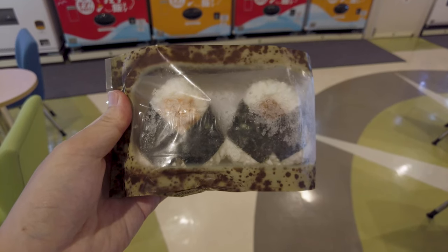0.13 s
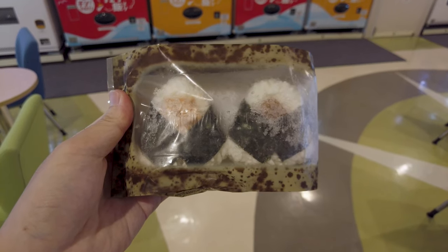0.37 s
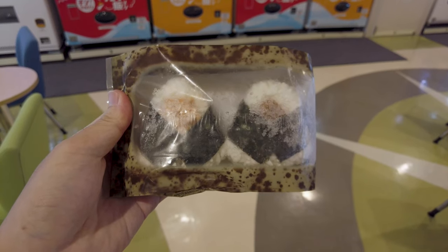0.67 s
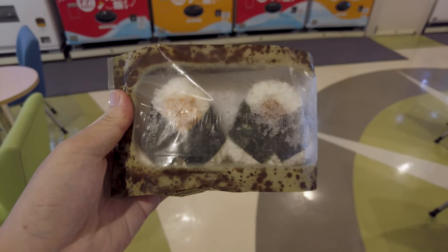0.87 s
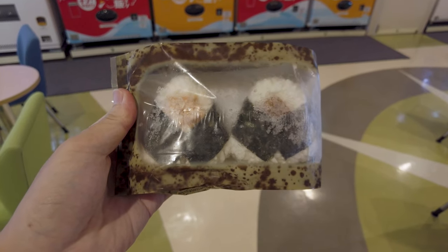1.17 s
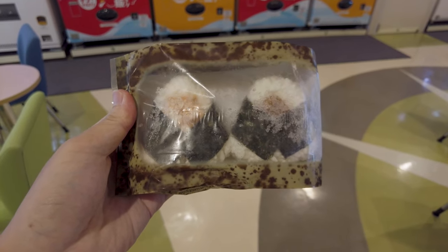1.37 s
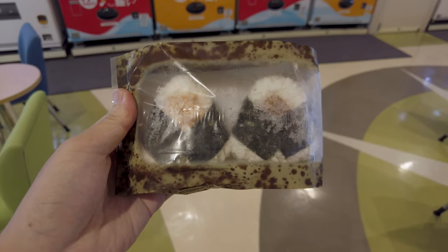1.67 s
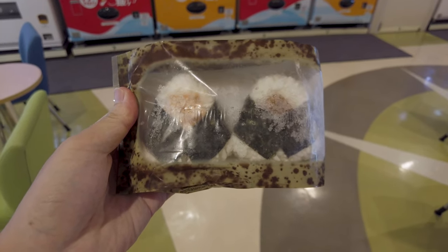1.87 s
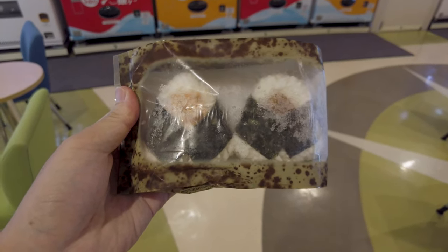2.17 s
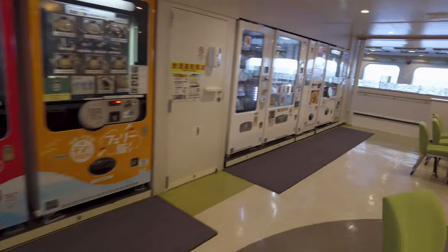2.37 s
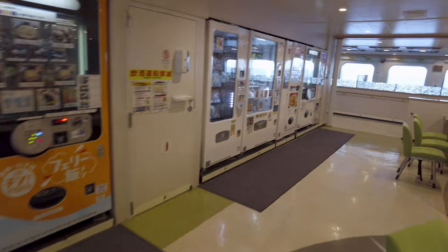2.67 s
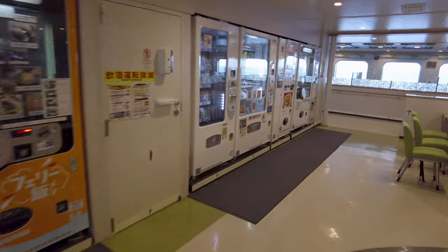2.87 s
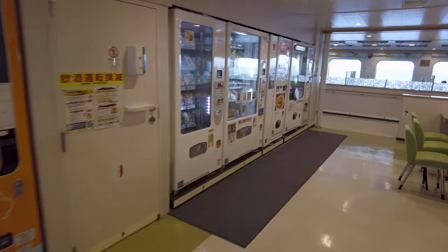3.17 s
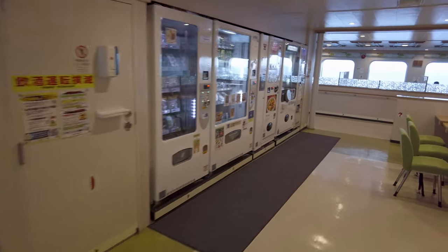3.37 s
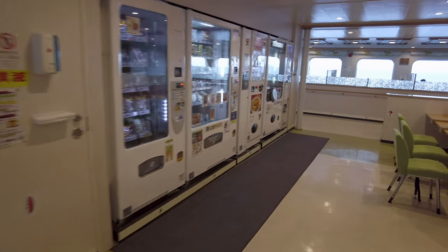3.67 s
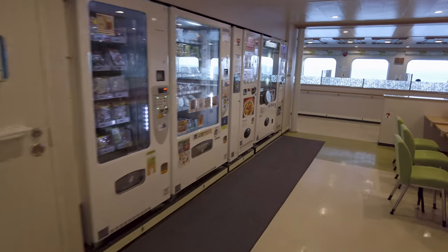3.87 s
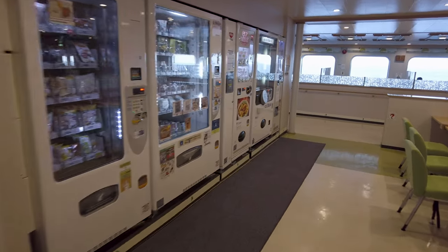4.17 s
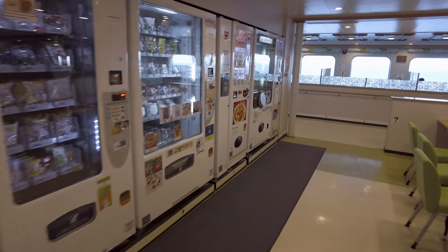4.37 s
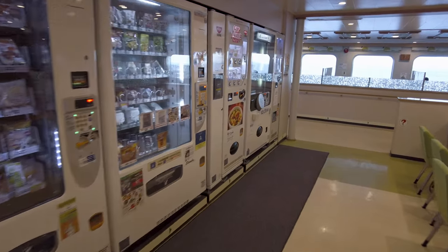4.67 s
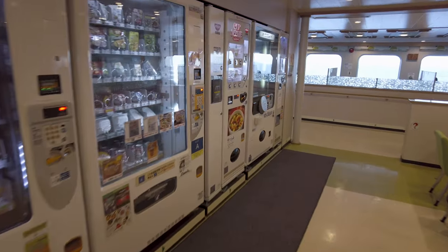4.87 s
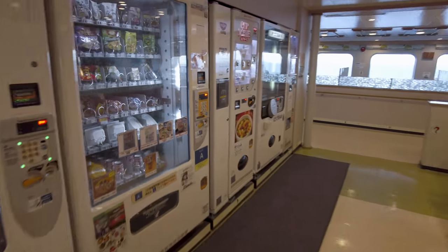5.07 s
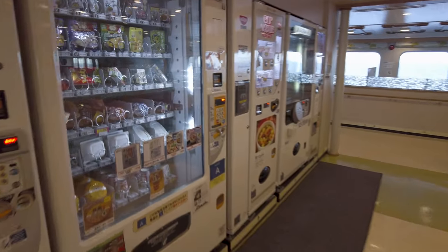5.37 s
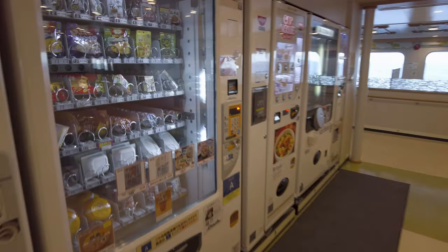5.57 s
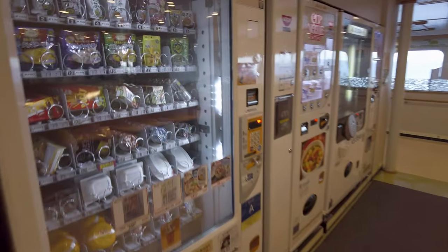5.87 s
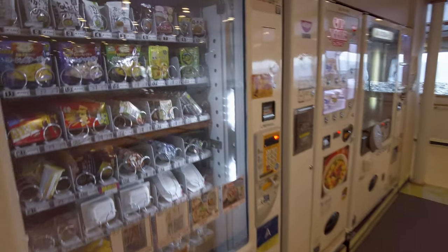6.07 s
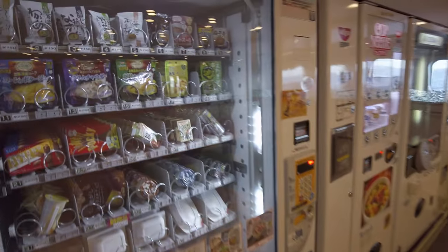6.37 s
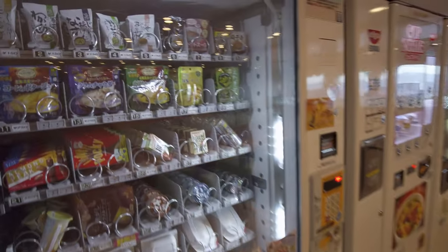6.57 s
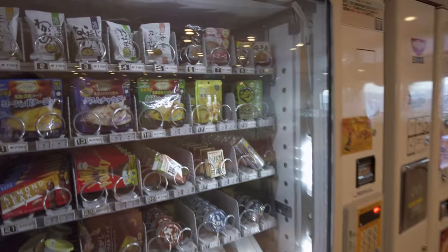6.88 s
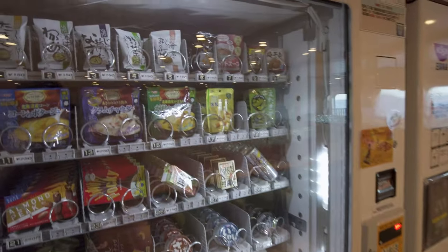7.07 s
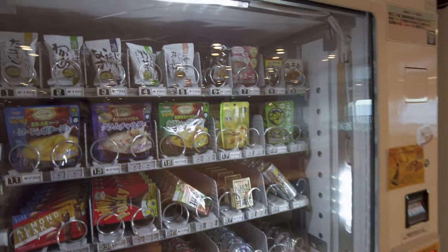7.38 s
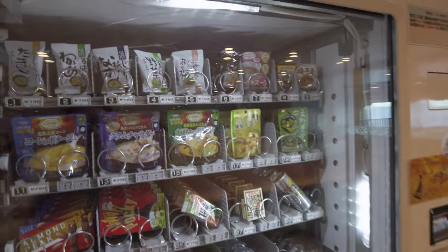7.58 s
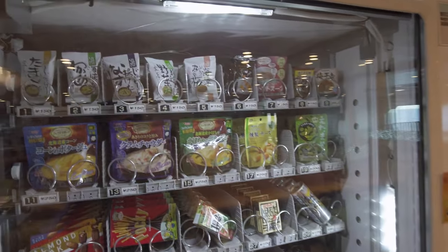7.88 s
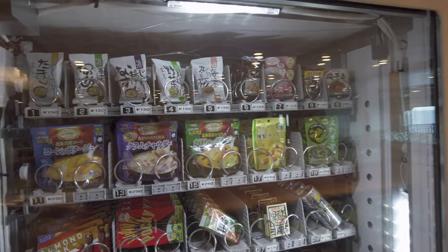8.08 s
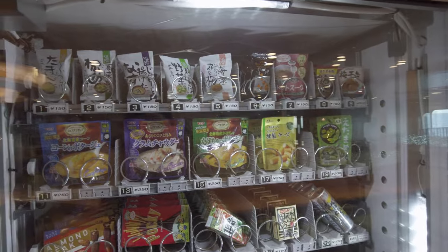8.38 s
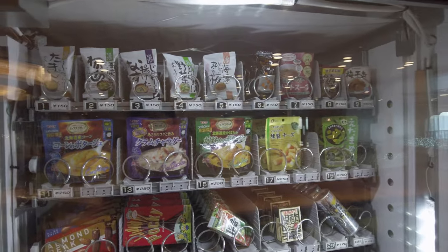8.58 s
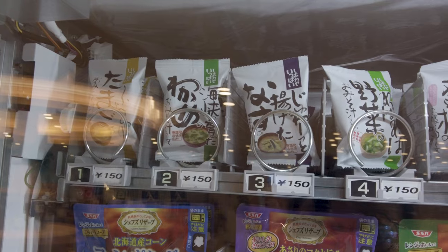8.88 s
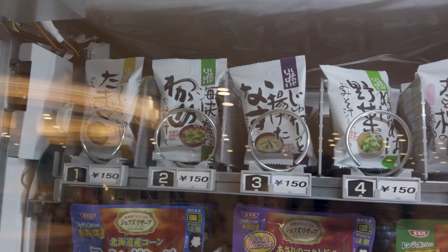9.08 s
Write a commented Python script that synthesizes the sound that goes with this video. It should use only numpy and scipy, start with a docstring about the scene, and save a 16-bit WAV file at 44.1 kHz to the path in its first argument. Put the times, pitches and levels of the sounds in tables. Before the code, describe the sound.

Inside a ferry, a low pulsing engine drone and steady air hiss carry on beneath soft swishes, light scuffs and one late click.

```python
"""A deep throb fills a ferry's lounge: the hull shakes with every turn of the propeller shaft.
Ventilation rushes, the cabin hums and vending machines whine faintly, heard first at a table, then in
the aisle, then at a machine. Soft swishes, scuffs, squeaks and ticks lie on top, and a sharp pop comes
near the end. Surges of the throb drive a limiter, so the hiss drops abruptly and creeps back."""
import sys
import numpy as np
from scipy import signal
from scipy.fft import rfft, irfft
from scipy.io import wavfile
from scipy.ndimage import uniform_filter1d, minimum_filter1d

SR = 44100
rng = np.random.default_rng(int(sys.argv[2]) if len(sys.argv) > 2 else 0)


def generate_wav(sig):
    """Save sig (samples, or channels by samples) to the path in sys.argv[1] as 16-bit PCM at SR."""
    pcm = np.round(np.clip(np.atleast_2d(sig).T, -1, 1) * 32767).astype(np.int16)
    wavfile.write(sys.argv[1], SR, pcm)


N = 407484
T = np.arange(N) / SR
HZ = np.maximum(np.arange(N // 2 + 1) * SR / N, 1e-3)
POP_S = 8.7677


def hull(where, shaft_hz=1.99, waver=0.28, evenness=0.72, thinning_db=-9):
    """The shaft shakes the hull at multiples of its turning rate. After the pop the throb is duller."""
    # Strong tones, mostly propeller blade beats. Each row: multiple of the turning rate,
    # then relative level in dB at the table, aisle and machine.
    blade_beats = [(6, -17, -19, -16), (9, -16.5, -21, -11.6), (12, -14.5, -16, -21.5), (15, -23, -17, -22),
                   (16, -26, -22.5, -21.5), (20, -26, -25, -31), (24, -28, -38, -39), (30, -32, -36, -36)]
    # All the other multiples. Each row: pitch in Hz, relative level in dB.
    weak_tones = [(8, -35), (14, -25), (22, -23.5), (34, -26.5), (42, -33.5), (52, -38.5), (66, -48),
                  (86, -49), (100, -61)]
    strong = {round(multiple): levels for multiple, *levels in blade_beats}
    thinning = from_db(thinning_db * (T > POP_S))
    out = np.zeros(N)
    for multiple in range(4, 50):
        hz = multiple * shaft_hz
        gain = from_db(strong[multiple]) @ where if multiple in strong else from_db(at_hz(weak_tones, hz))
        if multiple > 9:
            gain = gain * thinning
        out += gain * (1 + waver * drift(count=24)) * np.sin(2 * np.pi * (hz * T + rng.random()))
    size = SR // 28
    crest = smooth(-minimum_filter1d(-np.abs(out), 2 * size), size)
    return out / crest.mean() / (crest / crest.mean()) ** evenness   # makes the crests nearly even


def surging(throb, level_db=-3.0, lull_db=-11, rise_s=0.02, fall_db_per_s=59,
            swing_hz=24.7, swing_s=0.018, swing_db=-1.02):
    """The throb slackens in lulls and shudders in surges, each opened by one full swing of the hull."""
    # Lulls. Each row: middle in seconds, half-length in seconds.
    lulls = [(0.916, 0.032), (2.031, 0.012), (2.413, 0.017), (5.75, 0.01), (2.71, 0.018), (4.69, 0.037),
             (6.181, 0.017), (7.18, 0.022), (8.19, 0.032), (8.685, 0.017), (9.235, 0.01)]
    # Surges. Each row: start in seconds, extra level in dB, hold in seconds.
    surges = [(0.016, 4.5, 0.034), (0.337, 3, 0.062), (0.507, 3, .02), (0.834, 4.5, 0.026),
              (0.991, 4.5, 0.013), (1.33, 3, 0.016), (1.469, 3.5, 0.045), (1.83, 4, 0.026),
              (2.003, 3.5, 0.046), (2.45, 3, 0.049), (2.884, 2.5, 0.033), (3.138, 2, 0.1),
              (3.546, 1, 0.067), (3.801, 1.5, 0.029), (4.028, 3, .02), (4.108, 2, 0.047),
              (4.273, 3.5, 0.018), (4.531, 0.5, 0.041), (4.62, 4, 0.06), (4.767, 3, 0.067), (4.951, 1, .01),
              (5.08, 2, .02), (5.122, 4.5, 0.028), (5.274, 2.5, 0.038), (5.437, 4, 0.014),
              (5.725, 3, 0.073), (5.939, 3, 0.013), (6.026, 2.5, 0.047), (6.132, 4, 0.041),
              (6.318, 3, 0.11), (6.509, 2, 0.087), (6.739, 1, 0.059), (6.953, 2, 0.13), (7.094, 3.5, 0.042),
              (7.418, 1, 0.033), (7.508, 1, 0.0092), (7.629, 2, 0.014), (7.768, 2, .05), (7.843, 4, 0.11),
              (7.934, 4, 0.063), (8.079, 5, 0.092), (8.268, 7, 0.07), (8.436, 4, 0.11), (8.577, 3, 0.06),
              (8.725, 2, 0.15), (9.153, 3.5, 0.11)]
    out = throb * from_db(lull_db * sum(bump(s, length) for s, length in lulls))
    extra_db = np.zeros(N)
    for s, db, hold in surges:
        i = np.flatnonzero(np.abs(T - s) < .1)
        near = bump(s, swing_s)[i]
        swing = np.cos(2 * np.pi * swing_hz * (T[i] - s))
        direction = np.sign(np.sum(near * swing * out[i]))   # the way the hull already moves
        out[i] += near * (from_db(swing_db) * direction * swing - out[i])
        rise = np.clip((T - s) / rise_s + 1, 0, 1)
        held_db = np.clip(db - fall_db_per_s * (T - s - hold), 0, db)
        extra_db = np.maximum(extra_db, rise * held_db)
    return out * from_db(level_db + extra_db)


def pop(throb, left=0.49, right=0.71, span_s=0.0085):
    """A sharp click where the throb breaks off and jumps to a new value."""
    age = T - POP_S
    near = np.exp(-np.abs(age) / span_s) * (1 + np.abs(age) / span_s)
    return throb * (1 - near) + near * np.sign(age) * np.array([[left], [right]])


def ventilation(where, air_db=0.38, drone_db=-1.6, air_depth=0.74):
    """A low cabin drone and rushing air swell and sink slowly together."""
    # Tone colours of drone and air: "common" reaches both ears alike, "diffuse" differs between them.
    # Each row: frequency in Hz, relative level in dB.
    drone_common = [(20, -47.5), (45, -40), (65, -44.5), (85, -54), (102, -53), (150, -57.5), (200, -61.5),
                    (280, -64.5), (400, -68), (600, -81.5), (1200, -105)]
    drone_diffuse = [(20, -60.5), (60, -73), (120, -75), (250, -73.5), (450, -76.5), (1200, -105)]
    air_common = [(200, -83.5), (550, -72.5), (800, -77), (1060, -78.5), (1200, -79.5), (1240, -75),
                  (1700, -79), (2450, -86), (3200, -88), (3600, -91.5), (4600, -93), (8000, -106),
                  (11000, -111), (15500, -114)]
    air_diffuse = [(200, -95), (550, -75.5), (1160, -75), (1240, -83.5), (2400, -88), (3200, -88),
                   (3600, -93.5), (4400, -91.5), (6300, -100), (9000, -111), (15500, -120)]
    # The slow swell. Each row: time in seconds, relative level in dB.
    slow_level = [(0.0, -42), (.7, -42.5), (1.5, -43), (2.3, -42.5), (2.6, -44.5), (3.75, -43.5),
                  (4.1, -45), (4.5, -46.5), (5.0, -45.5), (5.55, -44.5), (6.3, -44.5), (6.85, -44),
                  (7.6, -46), (8.3, -45), (8.95, -45.5), (9.24, -46)]
    level = np.interp(T, *np.transpose(slow_level))
    swell_db = level - level.mean()
    drone = room_noise(drone_common, drone_diffuse, where) * from_db(drone_db + swell_db)
    air = room_noise(air_common, air_diffuse, where) * from_db(air_db + air_depth * swell_db)
    return drone + by_the_glass(air)


def room_noise(common, diffuse, where, ripple_db=1.7, count=700):
    """Broad noise, coloured at each spot by resonances and by a fine ripple from reflections."""
    # Resonances and hollows of cabin, ducts and compressors. Each row: frequency in Hz, width in Hz,
    # then boost in dB at the table, aisle and machine.
    resonances = [(112.5, 13, 0.5, 3, 5), (151, 7.1, 0.5, 4, 5.5), (174.1, 7, 5, 12.5, 6.5),
                  (235.8, 32, 4, 4.5, 5.5), (290, 27, 5, -0.5, 3.5), (360, 19, 4.5, 3.5, 0),
                  (450, 12, 3, 3.5, 1), (580, 56, -1.5, 2.5, 1), (680, 60, 1.5, -0.5, 1),
                  (772, 41, 1, 0.5, 3.5), (900, 45, 5.5, 0.5, 2.5), (1060, 230, -2.5, -2.5, -1),
                  (1480, 460, -1.3, 0, 0.5), (2070, 110, -0.5, 1, 1.5), (2640, 110, 0.5, 0.5, 1.5),
                  (2980, 280, 3, 3, 3), (11400, 4300, -2.5, -2.5, -2), (13800, 2600, -5, -3, -4.5)]
    shapes = np.array([bell(hz, width) for hz, width, *_ in resonances])
    boost_db = np.array(resonances)[:, 2:].T @ shapes
    grid_hz = np.linspace(0, HZ[-1], count)
    ripple = np.array([np.interp(HZ, grid_hz, row) for row in rng.standard_normal((3, count))])
    room = from_db(boost_db + ripple_db * ripple * (HZ > 400)) * (HZ > 10)
    parts = [where * noise(room * from_db(at_hz(colour, HZ))) for colour in (common, diffuse)]
    return stereo(*np.sum(parts, axis=1))


def by_the_glass(air, hz=930, width_hz=480):
    """Close to the machine's glass front, its reflection hollows out the middle of the rushing air."""
    # The hollow. Each row: time in seconds, depth from 0 to 1.
    hollow = [(5.0, 0.1), (6.3, 0.2), (7.6, 0.36), (8.7, 0.38), (8.8, .25)]
    depth = np.interp(T, *np.transpose(hollow))
    return air - depth * irfft(rfft(air) * bell(hz, width_hz), N)


def hums(waver_turns=.17, flutter_db=2.0, spread=.25):
    """A cabin resonance builds up to a wavering, fluttering tone and dies away."""
    # Hums. Each row: middle in seconds, level in dB, pitch in Hz, half-length in seconds.
    tones = [(0.335, -30, 82, .09), (0.448, -41, 243, .12), (0.872, -40, 222, .06),
             (1.655, -38.5, 238, 0.071), (2.27, -29, 78, 0.055), (2.664, -29, 76, 0.048),
             (2.917, -32, 74, 0.039), (5.42, -41.5, 240, 0.095), (6.05, -41.5, 241.7, .17),
             (6.681, -41, 243, .1), (6.852, -27, 90, .07), (8.444, -36, 226, 0.08)]
    out = 0
    for s, db, hz, length in tones:
        phase = 2 * np.pi * (hz * T + rng.random() + waver_turns * drift(count=260))
        swell = from_db(db + flutter_db * drift(count=260)) * bump(s, length)
        out += swell * np.sqrt(2) * stereo(np.sin(phase), spread * np.cos(phase))
    return out


def scuffs(spread=.6, rustle_db=-4.0):
    """Short rubs, as of soles and clothing: a dull body with a rustle on top."""
    # Scuffs. Each row: middle in seconds, body level in dB, relative rustle level in dB,
    # half-length in seconds.
    rubs = [(.16, -49, -48, 0.065), (0.662, -55, -47.5, 0.072), (1.163, -40.5, -45.5, 0.048),
            (1.29, -55, -52, .018), (1.672, -41.5, -46, 0.051), (2.162, -40.5, -54, 0.046),
            (2.29, -48, -55, .06), (2.79, -54, -52, .07), (3.75, -44, -50, 0.052), (3.886, -53, -57, .04),
            (4.32, -44, -46, 0.042), (4.465, -49, -51, 0.072), (5.526, -42.5, -48, 0.028),
            (5.655, -53, -55, 0.02), (6.235, -53, -48.5, 0.05), (6.7, -43.5, -52, 0.037),
            (6.876, -43.5, -43, 0.031), (7.228, -47, -55, 0.033), (7.327, -56, -53, 0.044),
            (7.706, -45.5, -52, 0.03), (8.225, -58, -53, 0.03), (8.69, -47, -54, 0.016),
            (8.948, -43, -51, 0.036), (9.11, -53, -56, .025)]
    # Tone colour of the body. Each row: frequency in Hz, relative level in dB.
    colour = [(100, -12.5), (300, 7), (800, 4), (1600, -1.5), (3000, -9), (6000, -21.5), (15500, -38)]
    shapes = np.array([bump(s, length) for s, *_, length in rubs])
    body, top = from_db(np.array(rubs)[:, 1:3].T) @ shapes
    dull = wide_noise(from_db(at_hz(colour, HZ)) * (HZ > 10), spread)
    return body * dull + from_db(rustle_db) * top * rustle()


def swishes(level_db=-6.0, tail_db=-8.5, tail_rise_s=.02, tail_s=0.07, spread=.7, grain_db=1.5):
    """Short brushing hisses: a bright, grainy start, then a duller rustling tail."""
    # Swishes, the first four a shaft turn apart. Each row: start in seconds, relative level in dB,
    # rise in seconds, decay in seconds.
    strokes = [(0.630, -43, .004, 0.033), (1.125, -41, .004, 0.031), (1.6265, -43, .004, 0.036),
               (2.1266, -48.5, .004, 0.027), (4.2144, -53, .005, 0.022), (4.2971, -55.5, .004, .035),
               (4.43, -62, .006, 0.059), (4.98, -56, .008, 0.037), (6.1894, -58, .005, 0.06),
               (6.6644, -58, .007, .033), (6.8563, -49.5, .004, .028), (7.27, -46, 0.012, 0.03),
               (7.517, -48, .008, 0.036), (8.024, -47.5, 0.01, 0.051), (8.518, -45.5, .012, 0.032)]
    # Tone colour of the bright start. Each row: frequency in Hz, relative level in dB.
    colour = [(300, 3.5), (1500, 1), (3000, 12), (5500, 9.5), (8000, 5.5), (10500, 5), (12300, 2),
              (14000, 6.5), (15500, 2.7)]
    head, tail = np.zeros((2, N))
    for s, db, rise_s, decay_s in strokes:
        age = np.maximum(T - s, 0)
        head += from_db(db) * (1 - np.exp(-age / rise_s)) * 2 * np.exp(-age / decay_s)
        tail += from_db(db + tail_db) * (1 - np.exp(-age / tail_rise_s)) * np.exp(-age / tail_s)
    hiss = wide_noise(from_db(at_hz(colour, HZ)), spread) * grain(grain_db)
    return from_db(level_db) * (head * hiss + tail * rustle())


def rustle(grain_db=3.0, spread=.7):
    """The fine, grainy hiss of rubbing."""
    # Its tone colour. Each row: frequency in Hz, relative level in dB.
    colour = [(500, -13.5), (1500, 0), (3200, -0.5), (5500, -6), (8000, -13.5), (15500, -25)]
    return wide_noise(from_db(at_hz(colour, HZ)) * (HZ > 300), spread) * grain(grain_db)


def ticks(ring_width_hz=1700, spread=0.46):
    """Each tick is a tiny burst of crackle through its own resonance."""
    # Ticks, the early ones from a plastic food pack. Each row: start in seconds, level in dB,
    # ring pitch in Hz, ring boost in dB, decay in seconds.
    clicks = [(0.1871, -23.5, 7000, 4, 0.0006), (0.1872, -29, 1800, 6, 0.0011),
              (0.1950, -31, 5500, 4, 0.0011), (0.486, -47, 1700, 4, 0.007), (0.77, -39, 2600, 14, 0.0009),
              (0.771, -36.5, 7060, 22, 0.001), (2.394, -30.5, 2500, 2, 0.00032)]
    # Tone colour of all ticks. Each row: frequency in Hz, relative level in dB.
    colour = [(500, -5), (1750, 8), (2600, 0), (4000, 1), (8000, -1), (9500, -11), (15500, -15)]
    out = 0
    for s, db, hz, ring_db, decay in clicks:
        gain = from_db(at_hz(colour, HZ) + ring_db * bell(hz, ring_width_hz))
        envelope = (T >= s) * np.exp(-np.minimum(np.abs(T - s) / decay, 50))
        out += from_db(db) * np.sqrt(np.mean(envelope ** 2)) * wide_noise(gain, spread, envelope)
    return out


def squeaks(spread=.5):
    """Faint, brief rubs that each sound one narrow resonance."""
    # Squeaks. Each row: middle in seconds, level in dB, pitch in Hz, width in Hz, half-length in seconds.
    rubs = [(2.997, -50, 2590, 200, 0.027), (4.308, -61, 10650, 400, 0.016),
            (6.187, -51.5, 4450, 260, 0.014), (6.87, -42, 1430, 260, 0.018)]
    return sum(from_db(db) * bump(s, length) * wide_noise(bell(hz, width), spread)
               for s, db, hz, width, length in rubs)


def whines(where, spread=.6, beam_db=8.0, beam_s=0.58, flicker_db=1):
    """Vending machines give thin, flickering whistles that swell as the listener crosses their beams."""
    # Whines. Each row: pitch in Hz, width in Hz, level in dB outside the beam at the table, aisle
    # and machine, then crossing time in seconds.
    whistles = [(5450, 220, -76, -95, -96.5, 1.7), (7800, 260, -92.5, -82, -92, 3.2),
                (10430, 280, -95.5, -84, -97, 2.7), (11000, 300, -91.5, -84, -93, 2.75),
                (12480, 420, -90, -81, -81.5, 2.7), (12930, 280, -91, -83.5, -85, 2.9),
                (14600, 200, -94.5, -91, -97, 3.3)]
    out = 0
    for hz, width, *levels, crossed_s in whistles:
        whistle = wide_noise(bell(hz, width), spread)
        swell = from_db(beam_db * bump(crossed_s, beam_s) + flicker_db * drift(count=150))
        out += swell * (from_db(levels) @ where) * whistle
    return out


def spots(switch_s=2.394, fade_s=.04, walk_start_s=3.9, walk_end_s=5.1):
    """Each spot's share: the table's sound switches abruptly to the aisle's, then a walk to a machine."""
    table = .5 - .5 * np.tanh((T - switch_s) / fade_s)
    machine = np.clip((T - walk_start_s) / (walk_end_s - walk_start_s), 0, 1)
    return np.array([table, 1 - table - machine, machine])


def from_db(db):
    """Decibels to gain."""
    return 10 ** (np.asarray(db) / 20)


def unit_power(x):
    """Scale to an average power of 1."""
    return x / np.sqrt(np.mean(x ** 2) + 1e-20)


def at_hz(points, hz):
    """Read a tone colour's level in dB between its rows."""
    row_hz, db = np.transpose(points)
    return np.interp(np.log(hz), np.log(row_hz), db)


def bell(hz, width_hz):
    """The peak of a resonance, 1 on top."""
    return 1 / (1 + (2 * (HZ - hz) / width_hz) ** 2)


def bump(middle_s, half_length_s):
    """A smooth swell up to 1 and back."""
    return np.exp(-((T - middle_s) / half_length_s) ** 2)


def smooth(x, size):
    """Average twice over size samples."""
    return uniform_filter1d(uniform_filter1d(x, size), size)


def drift(count):
    """Wander through count random values."""
    return np.interp(T, np.linspace(0, T[-1], count), rng.standard_normal(count))


def grain(depth_db):
    """A fast, random flicker in level."""
    return unit_power(from_db(depth_db * drift(count=2500)))


def noise(gain, envelope=1):
    """Noise shaped in time by envelope, then in frequency by gain."""
    return irfft(rfft(envelope * rng.standard_normal(N)) * gain, N) * np.sqrt(SR / 2)


def wide_noise(gain, spread, envelope=1):
    """Stereo noise; spread sets how much the ears differ."""
    common, diffuse = (unit_power(noise(gain, envelope)) for _ in range(2))
    return stereo(common, spread * diffuse)


def stereo(common, diffuse):
    """Left and right from what they share and what they do not."""
    return common + diffuse * np.array([[1], [-1]])


def scene(left_db=-1.0, right_db=2.5):
    """The throb leans to the right; the rest fills the room."""
    where = spots()
    throb = pop(surging(hull(where)) * from_db([[left_db], [right_db]]))
    room = throb + ventilation(where) + hums() + whines(where)
    return room + squeaks() + swishes() + scuffs() + ticks()


def limiter(x, ceiling=0.76, attack_s=0.012, release_db_per_s=44):
    """Each crest above the ceiling turns the whole sound down, and it creeps back: the hiss pumps."""
    over_db = 20 * np.log10(np.maximum(np.abs(x).max(axis=0) / ceiling, 1))
    duck_db = np.maximum.accumulate(over_db + release_db_per_s * T) - release_db_per_s * T
    size = int(attack_s * SR)
    return x * smooth(minimum_filter1d(from_db(-duck_db), 2 * size), size)


def record(dry, cutoff_hz=15750):
    """Limit the peaks, then cut off the highest treble."""
    top_cut = signal.ellip(10, .05, 50, cutoff_hz, fs=SR, output="sos")
    return signal.sosfiltfilt(top_cut, limiter(dry))


dry = scene()
out = record(dry)
generate_wav(out)
```